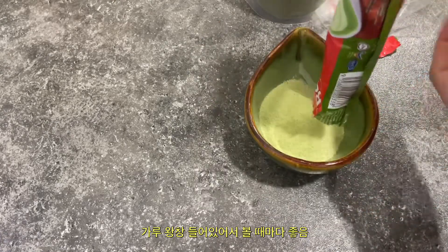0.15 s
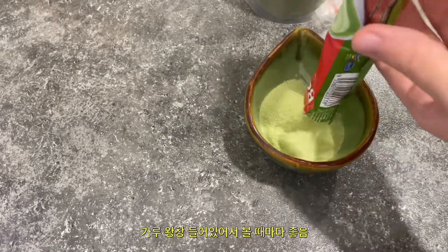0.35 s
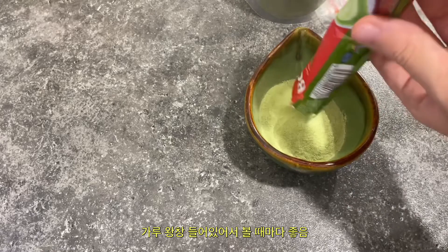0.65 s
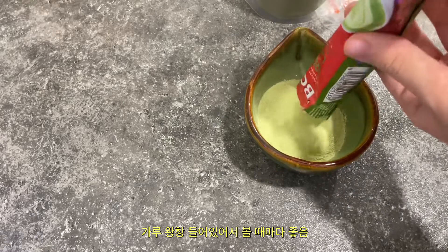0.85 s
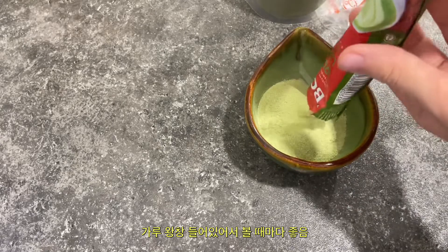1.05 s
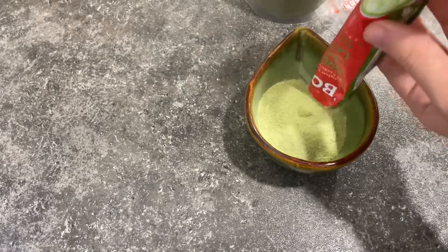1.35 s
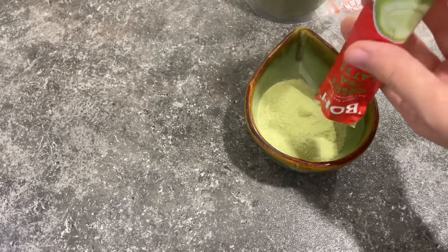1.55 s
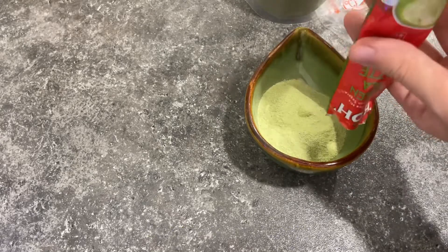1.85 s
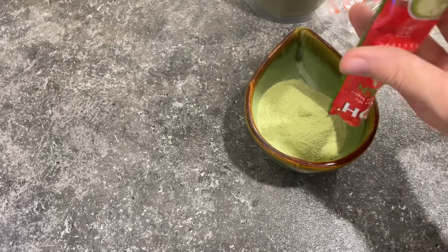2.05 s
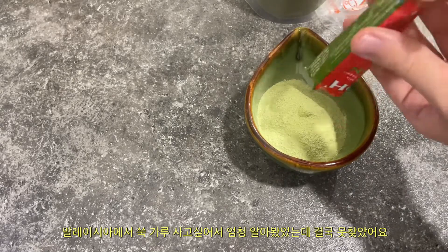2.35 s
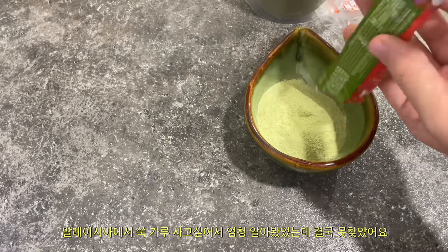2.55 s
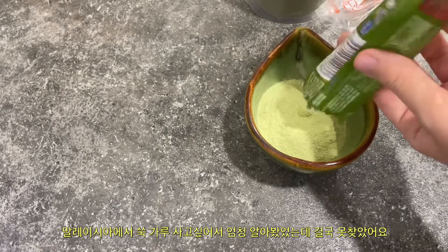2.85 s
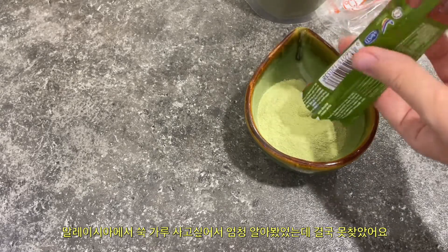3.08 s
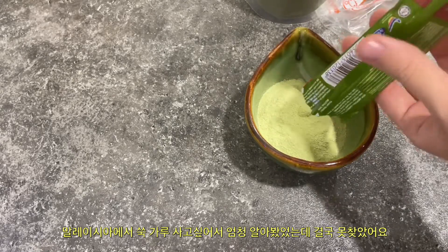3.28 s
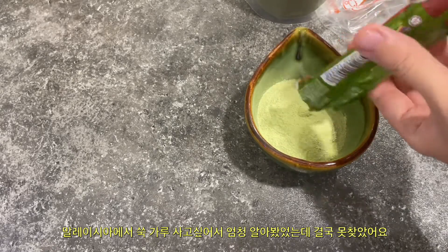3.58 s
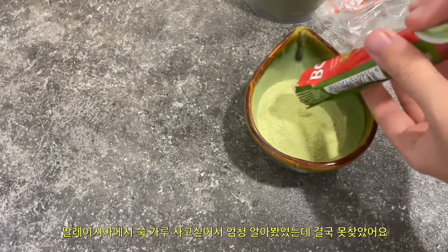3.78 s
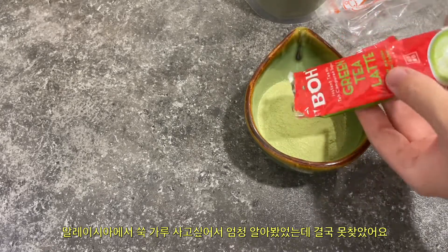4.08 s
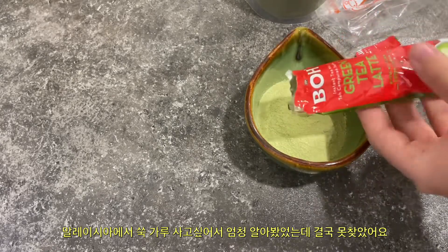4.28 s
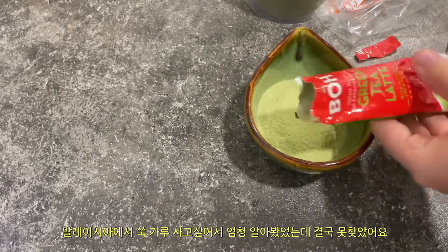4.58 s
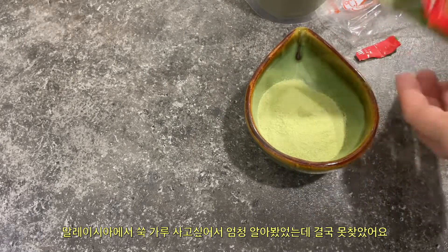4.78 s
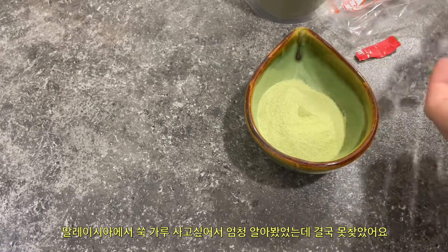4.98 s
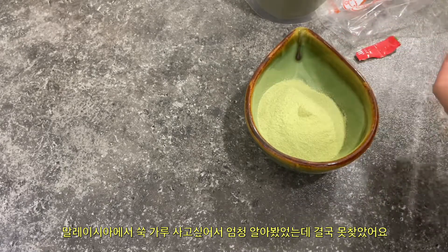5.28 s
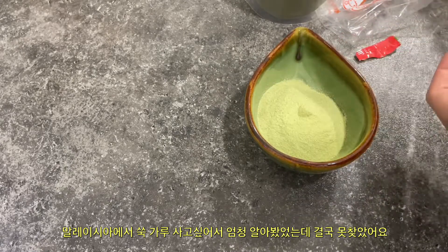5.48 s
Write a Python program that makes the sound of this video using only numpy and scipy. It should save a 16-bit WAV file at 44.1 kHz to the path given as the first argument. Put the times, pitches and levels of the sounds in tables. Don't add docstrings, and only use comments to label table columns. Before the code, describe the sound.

Low kettle rumble in a small kitchen, with crisp irregular crinkles and taps of a small foil packet being emptied near the microphone.

```python
import sys
import numpy as np
from scipy import signal
from scipy.fft import rfft, irfft, next_fast_len
from scipy.io import wavfile
from scipy.ndimage import uniform_filter1d, map_coordinates

SR = 44100
rng = np.random.default_rng(int(sys.argv[2]) if len(sys.argv) > 2 else 0)


def level_to_linear(level):
    exponent = np.asarray(level, float) / 20
    return 10 ** exponent


def wrap_up_sound(samples):
    columns = np.atleast_2d(samples).T
    tamed = np.clip(columns, -1, 1)
    steps = np.round(tamed * 32767).astype(np.int16)
    wavfile.write(sys.argv[1], SR, steps)


N = 248283


def unit(x):
    return x / np.sqrt(np.mean(x ** 2) + 1e-20)


def along(points, hz):
    f, *cols = np.transpose(points)
    return np.squeeze([np.interp(np.log(hz + 1), np.log(f), c) for c in cols])


def curves(rows):
    s, *cols = np.transpose(rows)
    return [np.interp(np.arange(N) / SR, s, c) for c in cols]


def wobble(rate):
    return map_coordinates(rng.standard_normal(int(N * rate / SR) + 4), [np.arange(N) * rate / SR])


def filtered(x, response):
    n = x.shape[-1]
    m = next_fast_len(n + min(n, 8192))
    return irfft(rfft(x, m) * response(np.fft.rfftfreq(m, 1 / SR)), m)[..., :n]


def modes(table):
    def response(f):
        total = 0
        for k, (centre, width, db) in enumerate(table):
            damping = 1j * f * width
            total = total + (-1) ** k * level_to_linear(db) * damping / (centre * centre - f * f + damping)
        return total
    return response


def colour(spectrum):
    return lambda hz: level_to_linear(along(spectrum, hz))


def noise(response, gain_db):
    strands = filtered(rng.standard_normal((2, N + 8192)), response)[:, -N:]
    return level_to_linear(gain_db) * unit(strands)


def ports(pair, path):
    low_hz, high_hz, delay_s = 5300, 14500, .000165

    def response(hz):
        alike, lead, side_db = along(path, hz)
        turn = np.arccos(np.clip(alike, 0, 1)) / 2
        lead = lead - 2 * np.pi * delay_s * (np.clip(hz, low_hz, high_hz) - low_hz)
        half = level_to_linear(side_db / 2) * np.exp(.5j * lead)
        return np.array([[half, half], [1 / half, -1 / half]]) * [np.cos(turn), np.sin(turn)]
    return filtered(pair, response).sum(axis=1)


# (t/s, rumble level/dB, wall ring level/dB)
KETTLE_HEAT = [(0.0, -28, -6), (.3, -27, -6), (.9, -27.5, -3.5), (1.5, -27.5, -1), (2.1, -27, -0.5),
               (2.7, -26.5, 1), (3.3, -28, 1.5), (3.9, -27, -5), (4.3, -28.5, -1), (4.72, -29, -1),
               (4.9, -26.5, -1.5), (5.1, -28, -2.5), (5.28, -32, -2.5), (5.45, -26.5, 1.5),
               (5.63, -30.5, -4)]
# (f/Hz, width/Hz, level/dB)
ROOM_WAVES = [(57.3, 15, -10), (96.6, 17.2, -5), (124, 11.2, 0), (134.5, 17, 0.5), (163, 47, -8),
              (201.5, 10.3, 1), (217.5, 22.3, -3), (244.6, 15.8, 0), (264.3, 12.1, -0.5), (316.7, 12.9, 1),
              (341.4, 6.9, -4.5), (363.3, 16.2, -13.5), (419, 7.9, -17), (444.4, 6.6, -13),
              (480.7, 8.2, -12), (559.7, 16.6, -20)]
# (f/Hz, width/Hz, level/dB)
HIGH_WAVES = [(474, 8.8, 1.5), (579, 12, 5.5), (642, 20, -11.5), (800, 10, 0), (869, 74, -4.5),
              (964, 50, -3), (1057, 19, -10), (1187, 36, -13.5)]
# (f/Hz, level/dB per Hz)
SIMMER_COLOUR = [(320, -37), (400, 4), (600, -1), (740, 0), (840, -4.5), (900, -9.5), (960, -4),
                 (1200, -26.5), (1350, -4), (1550, -43), (4000, -49)]
# (f/Hz, width/Hz, level/dB)
KETTLE_WALL = [(1850, 150, 6), (2050, 130, 3), (2900, 99, -8), (4100, 230, -9.5)]
# (f/Hz, likeness/0-1, left lead/rad, left-right level/dB)
FAR_PATH = [(60, .99, .1, 2.2), (170, .97, .3, 2.5), (215, .95, .55, 0), (260, .9, 1.05, -4.5),
            (350, .8, 1.1, -4.5), (480, .55, 1.05, .3), (610, .65, 2.3, 4.2), (800, .35, 3.8, 5.5),
            (1200, .2, 6, 5), (1900, .65, 5.8, 4.5), (3000, .5, 6.6, 3), (5000, .6, 6.4, 3),
            (8000, .9, 6.3, 0)]


def kettle():
    rumble_db, wall_db = curves(KETTLE_HEAT)
    simmer_db = -49 + 0.6 * np.arange(N) / SR
    surge = wobble(4.61)
    rumble = noise(modes(ROOM_WAVES), rumble_db + .5 * surge + .7 * wobble(14))
    bubbling_db = .8 * surge + 1.8 * wobble(25)
    simmer = noise(colour(SIMMER_COLOUR), simmer_db + 2.0 + bubbling_db)
    hum = noise(modes(HIGH_WAVES), simmer_db - 5.0 + bubbling_db)
    patches_db = 1.6 * wobble(12) + 2.6 * wobble(60)
    wall = noise(modes(KETTLE_WALL), -54 + wall_db + patches_db)
    return ports(rumble + simmer + hum + wall, FAR_PATH)


# (t/s, rustle level/dB)
FINGER_GRIP = [(0, -43), (0.1, -59), (1.15, -56.5), (1.3, -64), (1.7, -57), (2.2, -55.5), (2.55, -56.5),
               (2.85, -49), (3.3, -54), (3.55, -55.5), (3.85, -52), (4.12, -57), (4.4, -55), (4.65, -56),
               (4.85, -52.5), (5.31, -55), (5.37, -47.5), (5.63, -52)]
# (f/Hz, level/dB per Hz)
SLIDE_COLOUR = [(600, -8), (1300, 1), (2400, 9), (4100, 8), (5700, 1.5), (7500, -10), (9000, 2),
                (12000, -23)]
# (f/Hz, level/dB per Hz)
HISS_COLOUR = [(5000, -22), (7500, -5.5), (9000, -11), (11400, -12.5), (13000, -16), (15000, -13),
               (16400, -32)]


def rustle():
    pour_s, rise_s, end_s, fall_s, trickle = 0.22, 0.086, 0.91, 0.1, 0.47
    smoother_s = 4.7
    grip_db, = curves(FINGER_GRIP)
    t = np.arange(N) / SR
    opening = trickle * np.minimum((pour_s + rise_s - t) / rise_s, 1)
    shut = np.maximum(opening, (t - end_s) / fall_s)
    flow = level_to_linear(-45.5 - 25.5 * np.clip(shut, 0, 4))
    foil = np.clip(t / (end_s + fall_s), .5, 1) * np.where(t < smoother_s, 1.2, .45)
    clumps_db = foil * (2.4 * wobble(30) + 2 * wobble(140))
    clicks_db = 2.0 * foil * rng.exponential(size=N)
    grains = rng.standard_normal((2, N)) * level_to_linear(clicks_db + clumps_db)
    slide = np.hypot(flow, level_to_linear(grip_db)) * level_to_linear(-3.0) * unit(filtered(grains, colour(SLIDE_COLOUR)))
    hiss_level = np.hypot(flow * level_to_linear(-8), level_to_linear(-74.5))
    return slide + hiss_level * level_to_linear(4.0) * unit(filtered(grains, colour(HISS_COLOUR)))


# (t/s, level/dB, panel f/Hz, crispness/dB)
PITCHED_TICKS = [(0.019, -41, 2900, -5), (0.0492, -40, 1950, -3), (0.143, -46, 4600, -11),
                 (0.1885, -44, 4800, 6), (0.4, -36, 4670, -5), (1.2274, -34, 1300, 1),
                 (1.42, -46, 1340, -15), (3.193, -26, 2200, -14), (3.2397, -37, 2200, -10),
                 (3.4434, -41, 2190, -14), (3.568, -37, 1980, -15), (3.589, -37.5, 1940, -17),
                 (3.7846, -34, 2400, -1), (3.8836, -41, 4500, -3), (3.9257, -31, 2530, -17),
                 (3.971, -40, 2600, -22), (4.0032, -34, 1430, -26), (4.057, -42, 2600, -15),
                 (4.1896, -26.5, 1540, -4), (4.302, -40, 1900, -20), (4.3912, -37, 1320, -7),
                 (4.4394, -44, 3200, -3), (4.512, -33.5, 2300, -5), (4.6314, -46, 4200, -3),
                 (4.838, -42, 2900, -16), (4.878, -46.5, 3770, -12), (4.895, -45, 2000, -22),
                 (5.186, -42, 1930, -22), (5.316, -44, 2900, -22), (5.384, -39, 2750, -18)]
# (t/s, level/dB, crispness/dB)
FAINT_TICKS = [(0.0925, -31, -6), (0.1044, -40, 0), (0.3078, -30, -23), (0.3234, -41, -14),
               (0.3419, -36, -4), (0.4285, -36, -6), (0.623, -29, -9), (0.911, -30, -23),
               (0.9677, -24.5, -15), (1.0902, -38.5, -1.5), (1.127, -34.5, -6), (1.5214, -33, -19),
               (1.6398, -34, -23), (1.7392, -31, -6), (1.8287, -27.5, -28), (1.978, -31.5, -12),
               (2.098, -41, 2), (2.1451, -29.5, -23), (2.159, -37.5, -21), (2.2315, -36, -22),
               (2.3863, -32, -12), (2.4993, -35, -6), (2.5122, -36, -14), (2.585, -29, -21),
               (2.6125, -36, -13), (2.725, -37, -17), (2.7564, -29, -32),
               (3.088, -32.5, -6.5), (3.1, -37, -8), (3.156, -35, -28), (3.32, -40, -11), (3.3576, -36, -18),
              (3.3774, -32, -11), (3.403, -33, -12), (3.6229, -31, -3.5), (3.717, -29, -15),
              (3.8652, -31, -23), (3.894, -28.5, -7.5), (3.997, -38, -23), (4.077, -37.5, 1),
              (4.164, -27, -18), (4.214, -32, -19), (4.3101, -33, -7), (4.3706, -32, -15),
              (4.405, -35, -0.5), (4.5213, -28.5, -21), (4.558, -35.5, -6), (4.978, -34, -9),
              (5.05, -36, -29), (5.52, -36.5, -31), (5.5685, -33, -12.5), (5.605, -35.5, -10)]
# (t/s, level/dB, panel f/Hz, crispness/dB)
QUICK_CREASES = [(0.636, -24.5, 2200, 0), (0.641, -19.5, 2030, -3), (0.6508, -17.5, 2460, -2),
                 (0.674, -18.5, 2370, -2), (0.688, -26, 2030, -8), (0.6961, -20, 2120, -1.5),
                 (0.8062, -22, 1600, -0.5), (0.817, -23, 3500, -22), (0.8258, -21, 1450, -3),
                 (0.95, -24, 1900, -18), (0.9598, -27.5, 1620, -4), (1.1086, -27, 2780, -2),
                 (1.197, -20, 1980, -4.5), (1.216, -21, 1900, -25), (1.219, -23, 1770, -0.5),
                 (1.262, -13.5, 2180, -2.5), (1.4343, -17.5, 1300, -3), (1.4768, -22.5, 1420, -21),
                 (1.527, -17, 1820, -29), (1.539, -21, 1310, -44), (1.5539, -11, 1850, -5.5),
                 (1.5721, -22, 2100, 1), (1.5795, -24, 2110, 1), (1.6117, -21, 2470, -17),
                 (1.691, -22.5, 2080, -1.5), (1.709, -17.5, 1770, -0.5), (1.8506, -23.5, 2060, -32),
                 (1.8733, -24.5, 1450, -29),
                 (1.992, -29.5, 1900, -11), (2.034, -24.5, 1930, -5.5), (2.2454, -15.5, 1810, -10.5),
                   (2.2874, -18.5, 2040, -3), (2.3139, -21, 2520, -1), (2.3301, -25, 1860, -5.5),
                   (2.437, -25, 2420, -9), (2.472, -22.5, 1900, -13), (2.4814, -26, 2020, -30),
                   (2.504, -27, 1970, -11.5), (2.6032, -16, 1460, -6.5), (2.6456, -15.5, 1910, -15),
                   (2.794, -16, 2000, -5.5), (2.832, -10, 1850, -8), (2.8433, -11, 1880, -17),
                   (2.9357, -18.5, 1460, -3), (3.0557, -21.5, 1850, -11.5), (3.0821, -24, 2050, -19),
                   (3.1664, -25.5, 2300, -27), (3.198, -15, 1900, -10), (3.204, -26, 1890, -25),
                   (3.2217, -15.5, 2050, -3), (3.3885, -16, 1900, -2), (3.4101, -22.5, 1450, -4),
                   (3.426, -34, 2380, -15), (3.434, -14.5, 2220, -7),
                 (3.683, -25.5, 3000, -12), (3.7417, -24, 2290, -8), (3.752, -18.5, 2130, -7),
                 (4.0214, -30, 2700, -14), (4.028, -22, 2570, -7), (4.0354, -21.5, 1850, -15),
                 (4.1611, -22.5, 1700, -4), (4.2033, -23, 1980, -18), (4.2814, -28, 2480, 2),
                 (4.3246, -21.5, 2370, -9), (4.3534, -13, 2100, -9.5), (4.3785, -21, 2250, -10.5),
                 (4.486, -18, 2280, -8.5), (4.502, -30, 1940, -8), (4.5738, -24.5, 2300, -9.5)]
# (t/s, level/dB, panel f/Hz, crispness/dB, length/ms)
SLOW_FOLDS = [(4.677, -34.5, 2050, -25, 7.8), (0.8678, -22.5, 2010, -18, 2.6),
              (1.3068, -29, 1820, -3.5, 2.8), (1.3456, -26.5, 1710, -16, 5.7), (1.3826, -17, 2120, -3, 3.6),
              (1.3974, -23.5, 2500, -20, 1.7), (1.5859, -18, 1820, -14, 4.6), (1.5947, -36, 2170, -6, 8.2),
              (1.6986, -23.5, 1430, -24, 7.2), (1.7245, -29, 1600, -22, 8.9),
              (2.0467, -28.5, 1930, -11, 5.7), (2.4492, -26, 1930, -15, 4.6), (2.6389, -25, 4270, -5, 4),
              (2.6775, -20.5, 2080, -3.5, 2.6), (2.8043, -22.5, 1390, -45, 8),
              (2.8222, -14.5, 2550, -3.5, 8.4), (2.8971, -28, 1350, -9, 4.4), (3.1855, -34, 1150, -7, 3),
              (3.7662, -19, 2020, -6.5, 5.6), (3.78, -48, 2030, -4, 4.1), (3.9162, -20.5, 1370, -9, 4.5),
              (4.194, -25.5, 2120, -4, 5.9), (4.3417, -22.5, 3080, -6, 1.7),
              (5.3502, -28.5, 1840, -12.5, 13)]
# (t/s, thud level/dB)
TUBE_OPENING = [(0.64, 1), (0.69, -11), (0.87, -18), (0.95, -9), (1.39, 2.5), (1.6, -3.5), (2.75, -28),
                (2.9, -6), (3.4, -13.5), (4.0, -6), (4.3, -32), (4.6, -18)]


def creases():
    quick_ms, tick_ms, tick_hz, tick_spread = 1.44, 2.5, 1900, 0.095
    ticks = FAINT_TICKS
    pitch = tick_hz * np.exp(tick_spread * rng.standard_normal(len(ticks)))
    rows = [*SLOW_FOLDS]
    rows += [(*row, quick_ms) for row in QUICK_CREASES]
    rows += [(*row, tick_ms) for row in PITCHED_TICKS]
    rows += [(s, db, hz, crisp_db, tick_ms) for (s, db, crisp_db), hz in zip(ticks, pitch)]
    return [(*row, np.interp(row[0], *np.transpose(TUBE_OPENING))) for row in rows]


# (f/Hz, t60/s)
KITCHEN_DECAY = [(500, 0.45), (2000, 0.3), (6000, 0.35), (14000, 0.4)]
# (f/Hz, t60/s, level/dB)
BOWL_HUM = [(1894, 0.11, -45.5), (2750, 0.093, -51)]


def kitchen_answer(count):
    f, frames, z = signal.stft(rng.standard_normal((count, 2, SR // 5)), SR, nperseg=256)
    decay = level_to_linear(-60 * frames / along(KITCHEN_DECAY, f)[:, None])
    dullness = np.hypot(1, f / 6200)[:, None]
    tail = signal.istft(z * decay / dullness, SR, nperseg=256)[1]
    late = np.arange(tail.shape[-1]) / SR
    tail *= (1 - np.exp(-late / 0.003)) / np.linalg.norm(tail, axis=-1, keepdims=True)
    tail *= level_to_linear(-12.5)
    bounce_ms = rng.uniform(.6, 3.5, (count, 2)).T
    for bounce in np.round(bounce_ms * SR / 1000).astype(int):
        tail[np.arange(count), :, bounce] += level_to_linear(-11.5)
    for hz, t60, db in BOWL_HUM:
        tail += level_to_linear(db - 60 * late / t60) * np.sin(2 * np.pi * hz * late)
    return tail


def peak(x):
    return x / np.sqrt(uniform_filter1d(x ** 2, size=60).max(axis=-1, keepdims=True) / 1.12)


def soft(f):
    return 1 / (1 + 1j * f / 4500) ** 2


# (f/Hz, width/Hz, level/dB)
SACHET_WALL = [(1370, 560, -7.5), (1930, 280, -11), (2370, 280, 5.5), (3350, 1830, -2), (3940, 1120, 4)]
# (f/Hz, width/Hz, level/dB)
TUBE_AIR = [(674, 410, -6), (978, 202, 3.5), (1060, 210, 3.5), (1420, 75, 2)]
# (f/Hz, level/dB per Hz)
CRISP_COLOUR = [(1500, -11.5), (3500, -1.5), (5000, -3), (6800, -2.5), (8500, -5), (10000, -6.5),
                (12700, -13), (15300, -13.5), (16600, -26)]


def snaps():
    columns = np.transpose(creases())[:, :, None, None]
    s, level_db, hz, crisp_db, ms, thud_db = columns
    count = len(s)
    t = np.arange(1280) / SR
    draw = rng.standard_normal((count, 2, len(t), 3))
    u = (1000 * t - 8) / ms
    lead_in = 1.12 * np.exp(u * 4.24) + 0.038 * np.exp(u * ms / 1.9)
    release = np.exp(-(np.abs(u) / 1.11) ** 0.85)
    shape = np.where(u < 0, lead_in, release)
    roughness = draw[:, :1, :, 1]
    cracks = shape * draw[..., 0] * level_to_linear(3.7 * roughness)

    scatter = rng.standard_normal((len(SACHET_WALL), 2, count, 1, 1))
    wall = []
    for (centre, width, db), (a, b) in zip(SACHET_WALL, scatter):
        wall.append((centre * (1 + 0.17 * a), width, db + 5.5 * b))
    panel_ring = peak(filtered(cracks, modes([(hz, .2 * hz, 0)])))
    wall_ring = peak(filtered(cracks, modes(wall)))
    body = peak(filtered(level_to_linear(6.0) * panel_ring + wall_ring, soft))
    thud = peak(filtered(cracks, lambda f: modes(TUBE_AIR)(f) * soft(f) * f / (f + hz)))
    edge = shape ** 1.03 * draw[..., 2] * level_to_linear(7.3 * roughness)
    crisp = peak(filtered(edge, colour(CRISP_COLOUR)))
    share = np.minimum(level_to_linear(crisp_db), .95)
    mix = np.sqrt(1 - share ** 2) * body + level_to_linear(thud_db - 7.5) * thud + share * crisp
    direct = level_to_linear(level_db - 3.5) * mix

    heard = signal.fftconvolve(direct, kitchen_answer(count), axes=-1)
    heard[..., :len(t)] += direct
    out = np.zeros((2, N + SR))
    starts = np.round((s.ravel() - .008) * SR).astype(int)
    for start, sound in zip(starts, heard):
        out[:, start:start + sound.shape[-1]] += sound
    return out[:, :N]


# (f/Hz, likeness/0-1, left lead/rad, left-right level/dB)
NEAR_PATH = [(780, 0.87, -1.4, -1), (1260, 1, -0.28, 1.5), (1620, 0.86, -1.34, -1.5), (2200, 1, -0.63, 1.5),
             (2700, 0.43, 0.91, 0.5), (4400, 0.88, -0.26, 4), (4400, 0.33, 1, 2), (7610, 0.89, 0.025, 1),
             (8640, 0.91, -0.39, 0.5), (16200, 0.9, 0.51, -0.5)]


def scene():
    return kettle() + ports(snaps() + rustle(), NEAR_PATH)


# (level/dB), sum then difference
WEAK_GAP = [
    [[-4]],
    [[-1.5]],
]


def thinned(x):
    thin_hz, top_hz, band, jump_db = 6500, 15850, 8, 6.0
    hz, _, z = signal.stft(np.array([x[0] + x[1], x[0] - x[1]]) / 2, SR, nperseg=1024)
    hz = hz[:-1]
    power = np.abs(z[:, :-1]) ** 2
    bands = power.reshape(2, -1, band, z.shape[-1]).sum(axis=2)
    bands = uniform_filter1d(bands, size=3, axis=1)
    bands = uniform_filter1d(bands, size=3, axis=2)
    weaker = bands < level_to_linear(WEAK_GAP) ** 2 * bands[::-1]
    weak = np.repeat(weaker, band, axis=1) & (hz[:, None] > thin_hz)
    treble = power[:, hz > thin_hz].sum(axis=(0, 1))
    steady = treble < level_to_linear(2 * jump_db) * np.roll(treble, 2)
    z[:, :-1] *= ~((weak | (hz[:, None] > top_hz)) & steady)
    mid, side = signal.istft(z, SR, nperseg=1024)[1][:, :N]
    return np.array([mid + side, mid - side])


def roll_off(x):
    return signal.sosfilt(signal.butter(12, 16520, fs=SR, output="sos"), x)


def record(dry):
    limited = filtered(dry, lambda hz: (hz < 16600) * (1j * hz / (35 + 1j * hz)) ** 2)
    return roll_off(thinned(limited))


dry = scene()
out = record(dry)
wrap_up_sound(out)
```